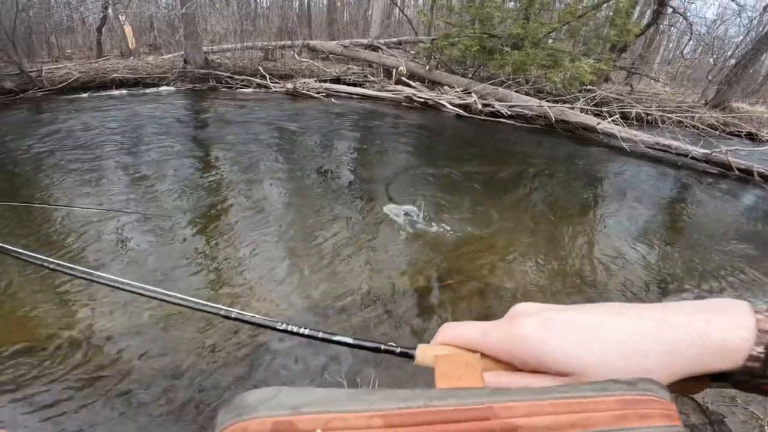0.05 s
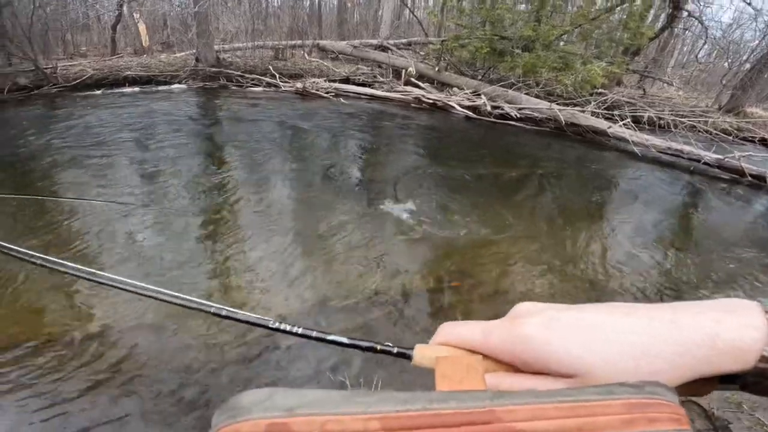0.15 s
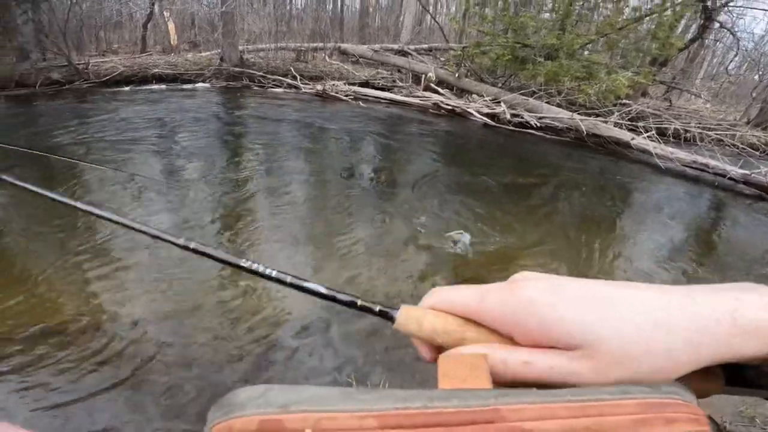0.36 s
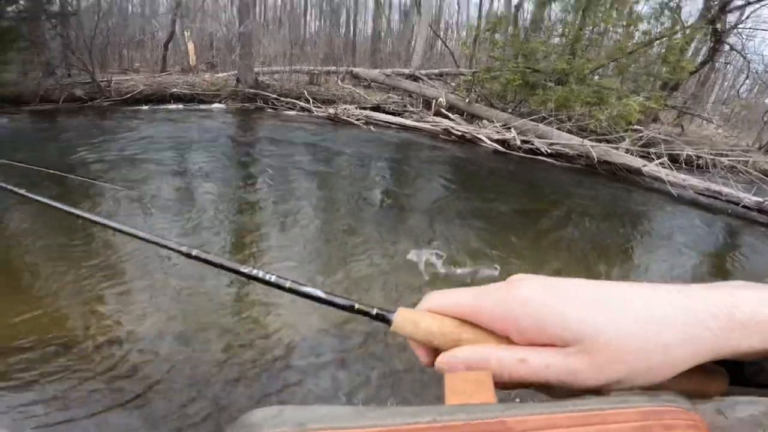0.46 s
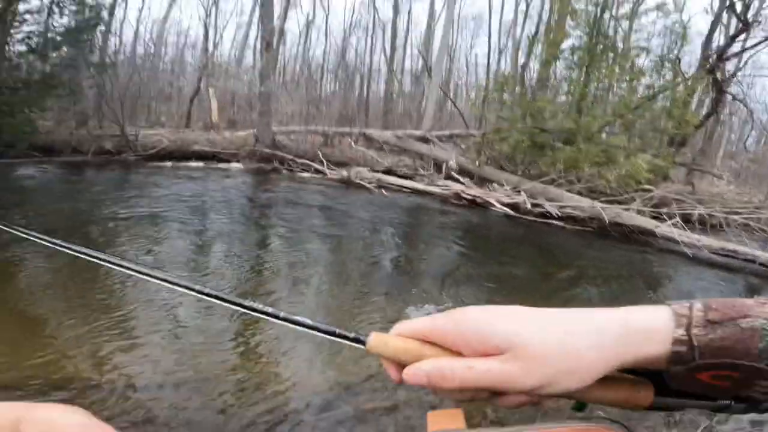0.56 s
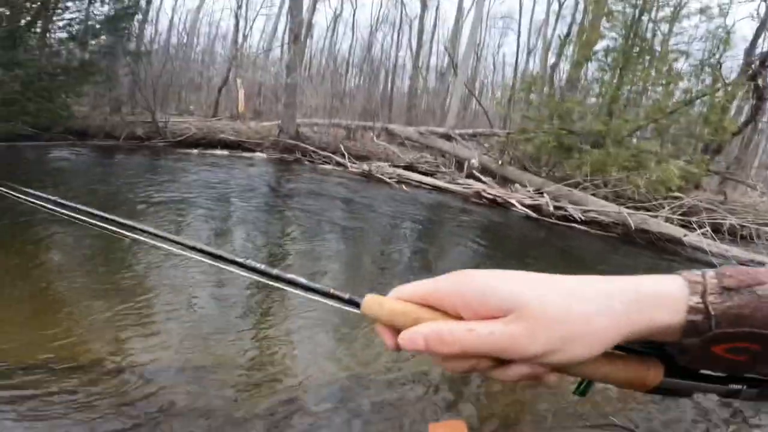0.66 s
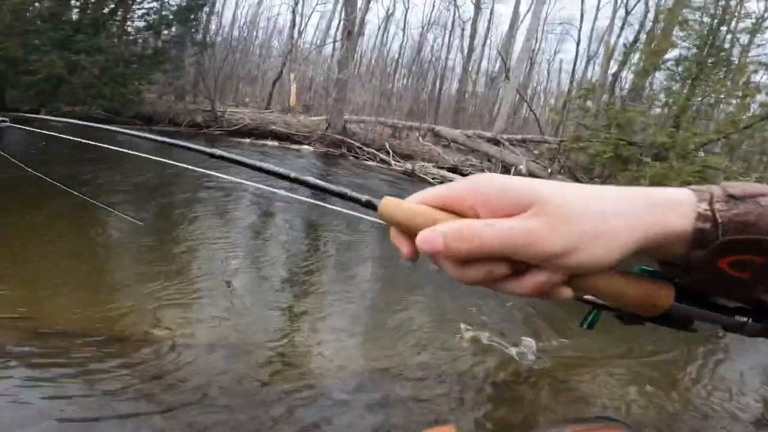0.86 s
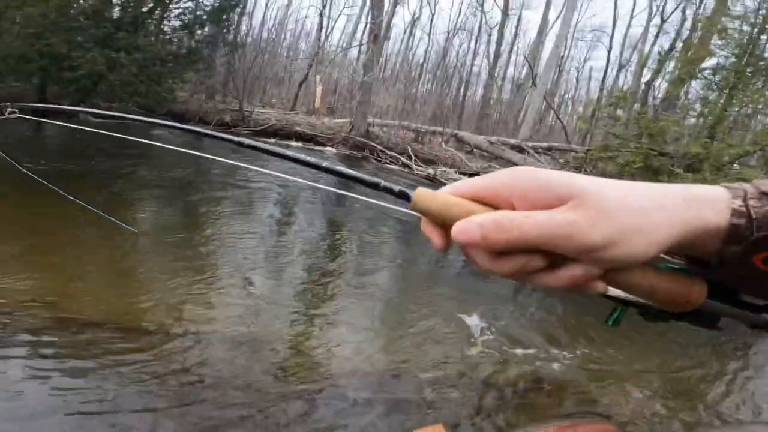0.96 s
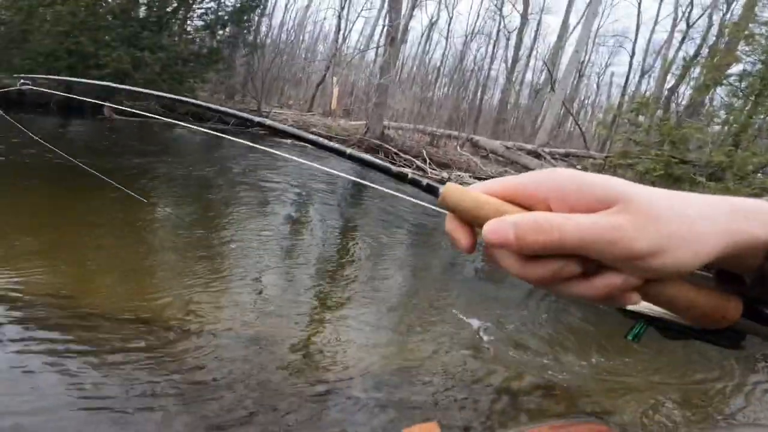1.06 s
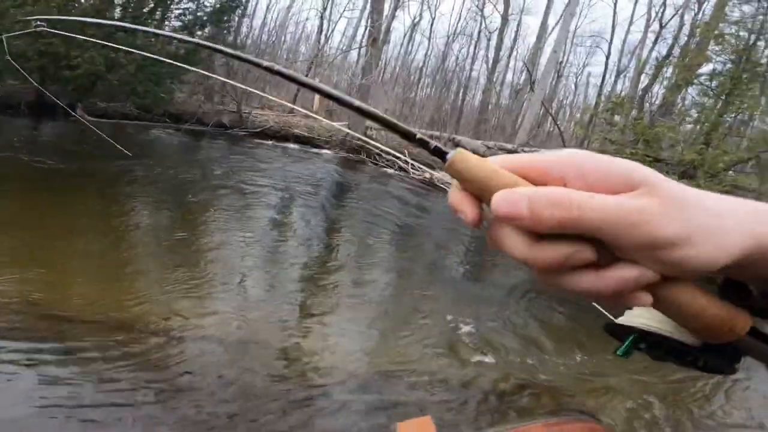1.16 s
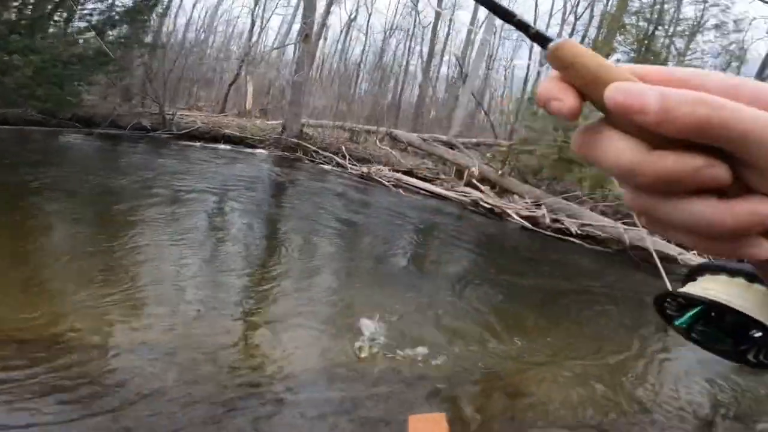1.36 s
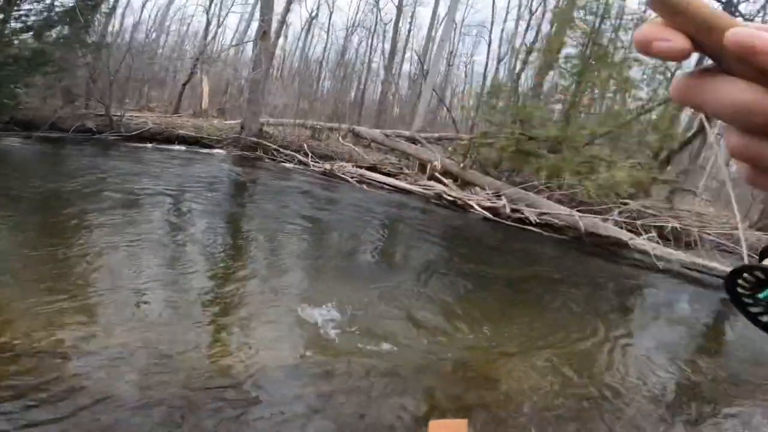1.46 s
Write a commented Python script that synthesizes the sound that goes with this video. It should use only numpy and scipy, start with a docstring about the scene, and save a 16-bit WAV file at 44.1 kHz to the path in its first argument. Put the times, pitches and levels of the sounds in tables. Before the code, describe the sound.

A river washes steadily throughout, with fizz, small bubbles and nearby plops. From about 0.3 seconds, moving air rumbles on the body-worn microphone. At 0.6 seconds fishing tackle clicks sharply and the line hisses faintly, while a sleeve rubs and thumps loudly until 0.8 seconds. A brief splash of wet slaps lands around 0.7 seconds. Scattered plops and light spray continue over the flow until 1.5 seconds.

```python
"""Angler lifting a rod by a river

A fish stirs the surface over a steady wash: fizz, small ringing bubbles, a few near plops, spray.
The rod comes up: tackle clicks, the line hisses in the guides, wet slaps ring trapped air.
The arm pushes air at a body-worn microphone; its sleeve rubs and bumps it, briefly overloading it."""
import sys
import numpy as np
from scipy import signal
from scipy.io import wavfile
from scipy.ndimage import uniform_filter1d

SR = 44100
rng = np.random.default_rng(int(sys.argv[2]) if len(sys.argv) > 2 else 0)


def log_audio(samples):
    """Write samples as a 16-bit WAV file to the path given in sys.argv[1]."""
    # one column per channel
    frames = np.atleast_2d(samples).T
    # limit to full scale, then quantise
    limited = np.clip(frames, -1, 1)
    pcm = np.round(limited * 32767).astype(np.int16)
    wavfile.write(sys.argv[1], SR, pcm)


N = 66150

# air buffeting the microphone: t/s, level/dB
BUFFET_LEVELS = [(0, -37.5), (0.12, -33), (0.26, -20.5), (0.31, -22.5), (0.41, -23), (0.46, -18),
                 (0.5, -20), (0.55, -18), (0.605, -13.5), (0.635, -9.5), (0.67, -21), (0.7, -8),
                 (0.735, -5.5), (0.775, -16.5), (0.818, -10.5), (0.85, -31.5), (0.93, -28.5), (1.1, -36.5),
                 (1.5, -29)]
# buffet spectrum: f/Hz, relative density/dB
BUFFET_DENSITY = [(15, 3.5), (30, 2.5), (55, -2), (80, -9.5), (130, -29.5), (250, -30.5), (800, -50),
                  (16000, -110)]
# sleeve rub: t/s, level/dB
RUB_LEVELS = [(0.5, -37), (0.58, -32), (0.601, -15), (0.613, -19.5), (0.623, -15), (0.645, -21),
              (0.678, -21), (0.694, -15), (0.728, -11), (0.748, -19.5), (0.782, -26), (0.796, -21.5),
              (0.825, -34.5), (0.86, -39)]
# rub spectrum: f/Hz, relative density/dB
RUB_DENSITY = [(40, 8), (95, 1.5), (170, 1.5), (330, -3.5), (480, -15.5), (750, -9), (1080, -18),
               (1600, -28.5), (2700, -27), (4200, -48), (8000, -35.5), (10500, -48.5), (14000, -58),
               (16000, -64)]
# soft arm bumps: t/s, level/dB, f/Hz
ARM_BUMPS = [(0.599, -18.5, 292), (0.602, -5.5, 107), (0.618, -16.5, 233), (0.6856, -3.5, 185),
             (0.694, -6.5, 343), (0.7076, -6, 225), (0.7184, -3, 150), (0.72, -8, 314), (0.731, -12, 365),
             (0.757, -6.5, 112), (0.7945, -4.5, 165), (0.987, -17, 157)]
# air puffs from the arm: t/s, level/dB, width/s
AIR_PUFFS = [(0.451, -2, 0.0081), (0.537, -6, 0.0082), (0.636, -0.5, 0.0057)]
# tackle contacts: t/s, level/dB
TACKLE_CLICKS = [(0.572, -31), (0.5981, 1), (0.618, -12), (0.625, -11.5)]
# tackle modes: f/Hz, gain/dB, t60/s
TACKLE_MODES = [(422, -3.5, 0.0046), (1390, -13, 0.0075), (2080, -16, 0.012), (2840, -21, 0.015),
                (5230, -17, 0.0034), (6330, -28, 0.0017), (12000, -23, 0.0034), (13400, -26, .002),
                (14400, -29, .004)]
# wet slaps: t/s, level/dB, f/Hz
WET_SLAPS = [(0.6912, -14, 1160), (0.6952, -8, 980), (0.7015, -11, 1210), (0.7052, -8, 925),
             (0.716, -9, 1000), (0.7245, -20, 774), (0.7305, -6.5, 625), (0.748, -26, 1000)]
# near bubbles at their peak: t/s, f/Hz, level/dB, decay/s, glide/(oct/s)
NEAR_BUBBLES = [(0.067, 933, -18.5, 0.0073, 41.5), (0.0993, 3557, -20, 0.0019, 16.5),
                (0.106, 824, -26.5, 0.0063, -12), (0.11, 290, -27, .02, 2.5),
                (0.146, 1060, -19, 0.0066, 16), (0.1505, 1340, -21, 0.0057, 25),
                (0.162, 1744, -26.5, 0.011, 3.5), (0.2165, 855, -20, 0.0053, -19.5),
                (0.231, 278, -17, 0.039, 7), (0.242, 485, -21.5, 0.011, 7), (0.2988, 1418, -12, 0.0011, 60),
                (0.324, 1237, -19, 0.0019, 22.5), (0.523, 1000, -26.5, .005, 18.5),
                (0.544, 393.5, -17, 0.0015, 27.5), (0.565, 954, -23.5, 0.0093, 14),
                (0.769, 1227, -20, 0.0022, 19), (0.966, 2550, -35, 0.0033, 12),
                (0.979, 1706, -32, 0.004, 27), (0.988, 890, -22, 0.002, 20.5),
                (1.019, 561, -23, 0.0068, 25), (1.03, 439, -27.5, 0.041, 2), (1.038, 1260, -24, 0.0054, 2),
                (1.141, 2520, -31, 0.0024, 16.5), (1.213, 1270, -25, 0.0035, 4.5),
                (1.218, 2720, -31.5, 0.0037, 29), (1.259, 596, -19.5, 0.0035, 20),
                (1.332, 875, -29, 0.0016, 8), (1.4309, 3600, -25, 0.0012, 6),
                (1.4335, 420, -10, 0.0036, 14), (1.4335, 1328, -23.5, 0.0026, 17.5),
                (1.467, 1757, -30, .003, 11), (1.47, 1177, -26, 0.0052, 9)]
# spray bursts, plus sleeve-rub crackle at 0.70-0.73 s (2-3 kHz): t/s, level/dB, centre f/Hz, decay/s
SPRAY_BURSTS = [(0.098, -41, 5000, .004), (0.0985, -46, 12800, .003), (0.149, -44, 5170, .008),
                (0.2385, -44, 12500, .002), (0.2982, -26, 5350, 0.0017), (0.414, -50, 10550, .002),
                (0.571, -38, 6000, 0.0022), (0.683, -35.5, 6100, 0.0063), (0.7029, -26.5, 1720, 0.0036),
                (0.722, -26.5, 2090, .005), (0.734, -24, 2480, .003), (0.734, -41, 10300, 0.016),
                (0.78, -31, 2300, .003), (0.791, -28.5, 2650, 0.0031), (0.907, -43, 5960, .0025),
                (0.913, -38.5, 5550, 0.0022), (1.012, -36.5, 5350, 0.0028), (1.02, -56, 7700, 0.23),
                (1.066, -56, 12000, .005), (1.086, -36, 5300, 0.0021), (1.138, -36, 2470, 0.0071),
                (1.209, -35, 2570, 0.0076), (1.427, -32, 3400, 0.0058), (1.461, -37.5, 7300, 0.0036),
                (1.486, -41.5, 8200, .006), (1.488, -56, 12800, .01)]
# line sliding through the guides: t/s, level/dB
LINE_LEVELS = [(0.55, -100), (0.58, -64), (0.61, -52), (0.634, -51), (0.65, -47), (0.662, -57),
               (0.69, -100)]
# line hiss resonances: f/Hz, relative level/dB, t60/s
LINE_MODES = [(12300, -2, 0.0024), (14200, -4, .005)]
# surface stir, common gain of fizz and swarm: t/s, level/dB
STIR_LEVELS = [(0, -50), (0.11, -44.5), (0.2, -47), (0.31, -46), (0.5, -46), (0.72, -37), (0.87, -51),
               (1.03, -48), (1.12, -49.5), (1.22, -51.5), (1.38, -56), (1.46, -44.5), (1.5, -45.5)]
# fizz spectrum: f/Hz, relative density/dB
FIZZ_DENSITY = [(700, -2), (1200, 3), (2500, 2), (4000, -3.5), (7000, -17), (10500, -29), (12500, -21),
                (14500, -32), (16000, -44)]
# river wash spectrum: f/Hz, relative density/dB
WASH_DENSITY = [(30, -4), (70, 5.5), (120, -5.5), (250, -11), (480, -8), (800, -13), (1250, -17.5),
                (1800, -24), (2800, -35.5), (4000, -40.5), (7000, -47), (10500, -60), (13000, -58),
                (16000, -80)]


def arm():
    """The moving arm pushes air at the microphone, drags its sleeve past it and bumps it."""
    air = banded_noise(BUFFET_DENSITY, patchy_db=1.5)
    air = air / np.sqrt(uniform_filter1d(air ** 2, size=2600) + 0.028)  # evened out over 59 ms
    cloth = banded_noise(RUB_DENSITY, patchy_db=2.5)
    cloth = rms_one(cloth * flicker(spread_db=1, rate_hz=630))
    bumps = 0
    for at_s, db, hz in ARM_BUMPS:
        thud = ring(impulse(at_s, db), hz, t60_s=0.041)
        knock = ring(impulse(at_s, db - 25), hz=1000, t60_s=0.0095)
        bumps += thud + knock
    return gain_curve(BUFFET_LEVELS) * air + gain_curve(RUB_LEVELS) * cloth + bumps


def puffs():
    """Single slow pressure swings from the lifting arm, felt more than heard."""
    out = np.zeros(N)
    for at_s, db, width_s in AIR_PUFFS:
        x = (seconds() - at_s) / width_s
        out += from_db(db) * (1 - (x / 2) ** 2) * np.exp(-.5 * x ** 2)
    return out


def tackle():
    """Small hard contacts: a noise crack and a very short ring."""
    crack_db, crack_decay_s = -41, 0.00047
    hits = sum(impulse(at_s, db) for at_s, db in TACKLE_CLICKS)
    envelope = signal.lfilter([1], [1, -np.exp(-1 / (crack_decay_s * SR))], hits + 1e-18)
    crack = from_db(crack_db) * envelope * rng.standard_normal(N)
    ringing = sum(from_db(db) * ring(hits, hz, t60_s) for hz, db, t60_s in TACKLE_MODES)
    return crack - ringing


def slaps():
    """Each slap traps an air pocket that rings for a few cycles."""
    t60_cycles = 9.3
    return sum(ring(impulse(at_s, db), hz, t60_cycles / hz) for at_s, db, hz in WET_SLAPS)


def plops():
    """Each near bubble swells, rings and glides unsteadily in pitch as it nears the surface."""
    out = np.zeros(N)
    waver_oct = 0.0504 * drift(rate_hz=232)
    for at_s, hz, db, decay_s, glide_oct_per_s in NEAR_BUBBLES:
        t = seconds() - at_s
        swell_s = min(0.44 * decay_s, .004)
        envelope = np.exp(-np.where(t < 0, (t / swell_s) ** 2, np.abs(t / decay_s) ** 1.05))
        pitch_hz = hz * 2 ** (np.clip(glide_oct_per_s * t, -1, 1) + waver_oct)
        phase = 2 * np.pi * (np.cumsum(pitch_hz) / SR + rng.random())
        out += from_db(db) * envelope * np.sin(phase)
    return out * flicker(spread_db=2, rate_hz=220)


def spray():
    """Droplets patter back in bursts; finer drops, higher band. The 2-3 kHz bursts at 0.70-0.73 s are instead
    crackle from the sleeve rubbing."""
    width_oct, rise_s = 0.55, 0.00078
    out = np.zeros(N)
    patter = flicker(spread_db=1, rate_hz=120)
    for at_s, db, hz, decay_s in SPRAY_BURSTS:
        t = np.maximum(seconds() - at_s, 0)
        edges_hz = np.minimum(hz * 2 ** (width_oct * np.array([-.5, .5])), SR / 2 - 1)
        hiss = rms_one(bandpass(rng.standard_normal(N), edges_hz))
        envelope = (1 - np.exp(-t / rise_s)) * np.exp(-t / decay_s)
        out += from_db(db) * hiss * envelope
    return out * patter


def line():
    """The tightening line hisses thinly in the rod guides."""
    hiss = sum(from_db(db) * rms_one(ring(rng.standard_normal(N), hz, t60_s))
               for hz, db, t60_s in LINE_MODES)
    return gain_curve(LINE_LEVELS) * rms_one(hiss)


def surface():
    """Stirred water: fizz and a swarm of small ringing bubbles."""
    bubbles_per_s, spread_db, tilt_db_per_oct, t60_cycles = 1300, 1.5, -3.5, 4.5
    swarm_db, fizz_db = 8.5, 6.5  # re stir level
    strengths = from_db(spread_db * np.minimum(rng.exponential(1, N), 4)) * rng.choice([-1, 1], N)
    births = strengths * (rng.random(N) < bubbles_per_s / SR)
    pitches_hz = np.geomspace(380, 7000, 30)
    pitch_index = rng.integers(0, len(pitches_hz), N)
    swarm = 0
    for k, hz in enumerate(pitches_hz):
        soft_onsets = hz * ring(births * (pitch_index == k), hz, t60_s=2 / hz)
        tilt = from_db(tilt_db_per_oct * np.log2(hz / pitches_hz[0]))
        swarm += tilt * ring(soft_onsets, hz, t60_cycles / hz)
    fizz = banded_noise(FIZZ_DENSITY, patchy_db=2.5)
    return gain_curve(STIR_LEVELS) * (from_db(swarm_db) * rms_one(swarm) + from_db(fizz_db) * fizz)


def river():
    """Running water: a steady broadband wash."""
    return from_db(-29) * banded_noise(WASH_DENSITY, patchy_db=3)


def banded_noise(spectrum, patchy_db):
    """Half-octave noise bands, each with its own level and flicker; rms 1."""
    edges_hz = 16 * 2 ** np.arange(0, 10.1, .5)
    hz, db = np.transpose(spectrum)
    out, white = 0, rng.standard_normal((2, 2 * N))
    for k, (low, high) in enumerate(zip(edges_hz, edges_hz[1:])):
        band = bandpass(white[k % 2], [low, high])[N:]
        centre_db = np.interp(np.log(low * high) / 2, np.log(hz), db)
        out += band * from_db(centre_db) * flicker(patchy_db, rate_hz=35.6)
    return rms_one(out)


def ring(clicks, hz, t60_s):
    """Resonator: a unit click starts a decaying sine of height 1."""
    r = np.exp(-np.log(1000) / (t60_s * SR))
    w = 2 * np.pi * hz / SR
    return signal.lfilter([0, np.sin(w)], [1, -2 * r * np.cos(w), r * r], clicks + 1e-18)


def drift(rate_hz):
    """Low-passed random wander; rms 1."""
    r = np.exp(-2 * np.pi * rate_hz / SR)
    return rms_one(signal.lfilter([1], [1, -2 * r, r * r], rng.standard_normal(2 * N))[N:])


def flicker(spread_db, rate_hz):
    return from_db(spread_db * drift(rate_hz))


def bandpass(x, edges_hz):
    return signal.sosfilt(signal.butter(2, edges_hz, "band", fs=SR, output="sos"), x)


def impulse(at_s, db):
    return from_db(db) * (np.arange(N) == int(at_s * SR))


def gain_curve(levels):
    return from_db(np.interp(seconds(), *np.transpose(levels)))


def from_db(db):
    return 10 ** (np.asarray(db) / 20)


def rms_one(x):
    return x / np.sqrt(np.mean(x ** 2) + 1e-20)


def seconds():
    return np.arange(N) / SR


def scene():
    """Water plus angler, mono."""
    water = surface() + river() + plops() + spray() + slaps()
    angler = arm() + tackle() + line() + puffs()
    return (water + angler)[None]


def record(dry):
    """Microphone overload: soft limit at full scale, then a steep low-pass."""
    cutoff_hz = 16500
    limited = dry / (1 + dry ** 6) ** (1 / 6)
    return signal.sosfilt(signal.cheby2(12, 70, cutoff_hz, fs=SR, output="sos"), limited)


dry = scene()
out = record(dry)
log_audio(out)
```